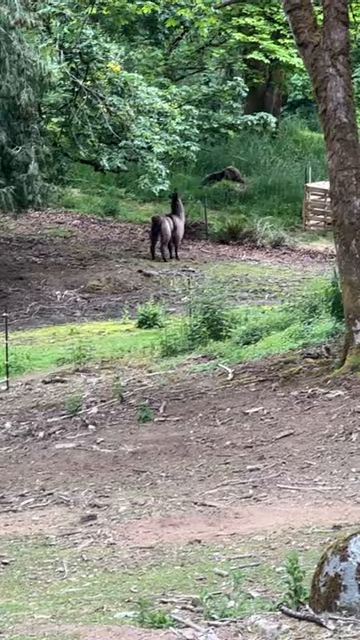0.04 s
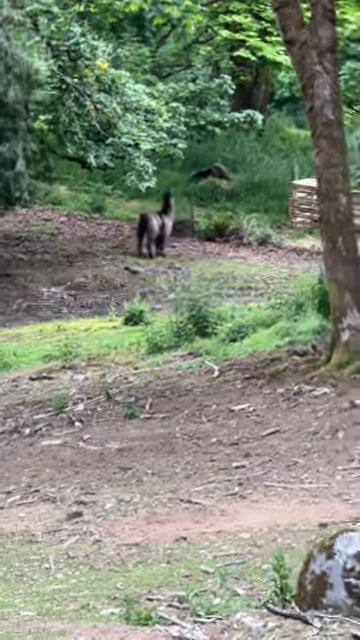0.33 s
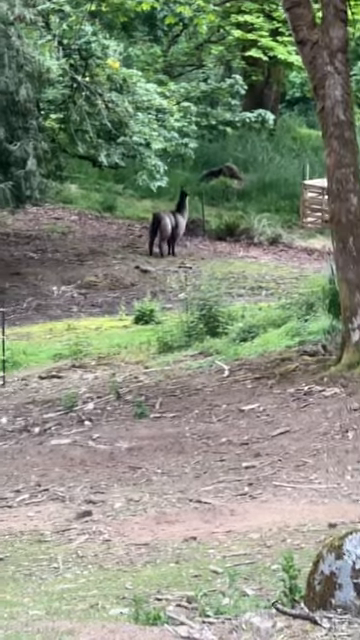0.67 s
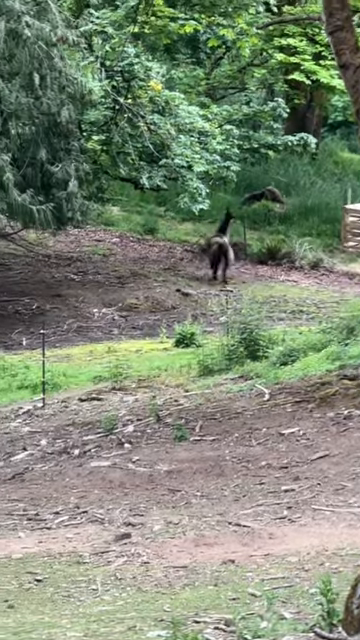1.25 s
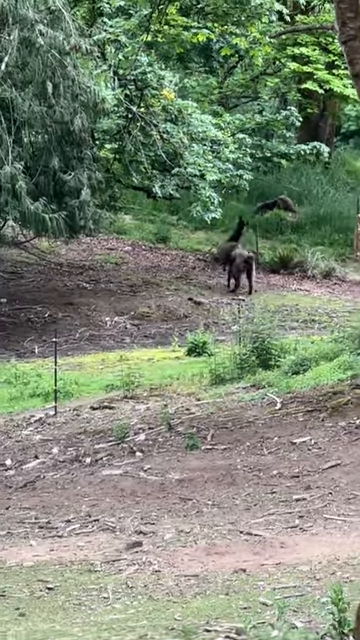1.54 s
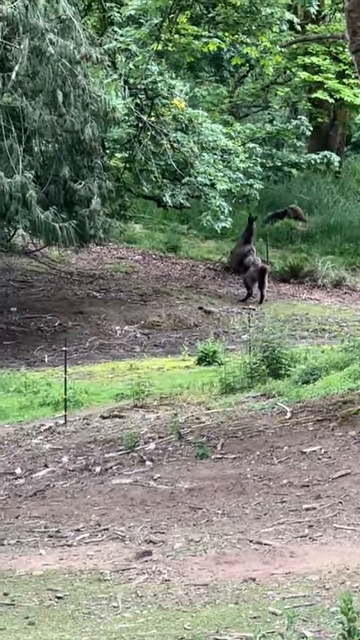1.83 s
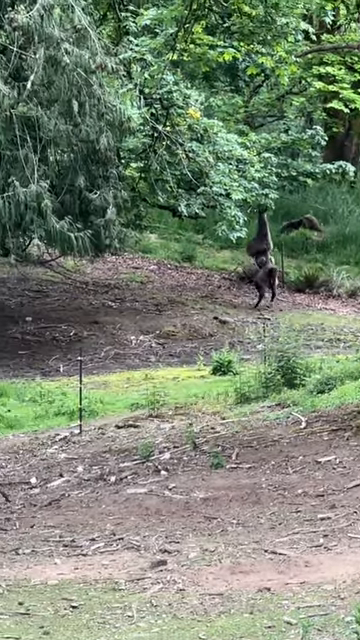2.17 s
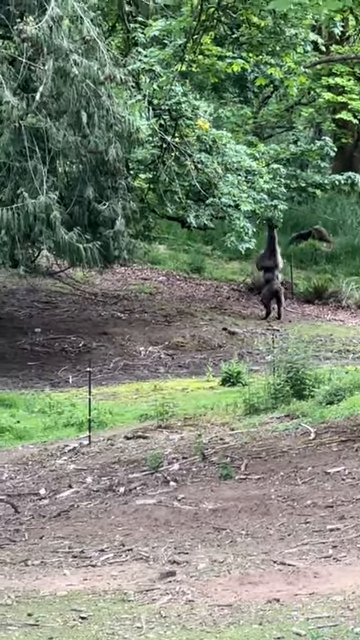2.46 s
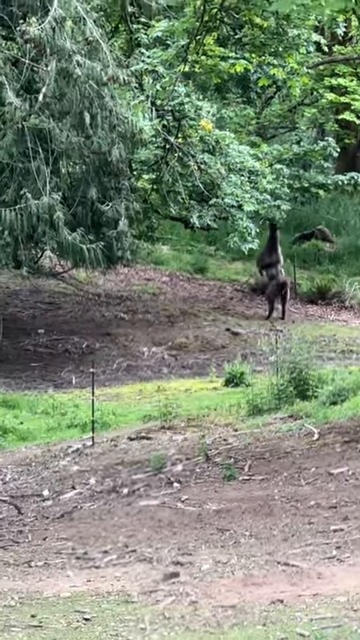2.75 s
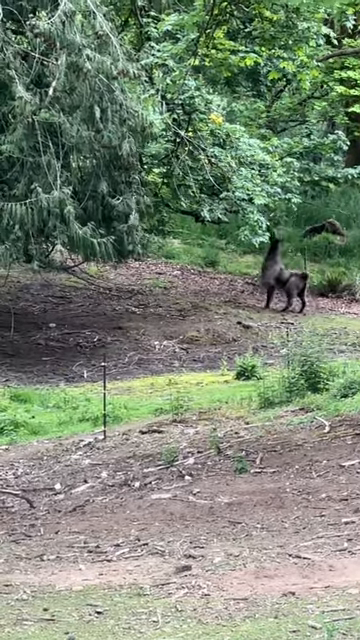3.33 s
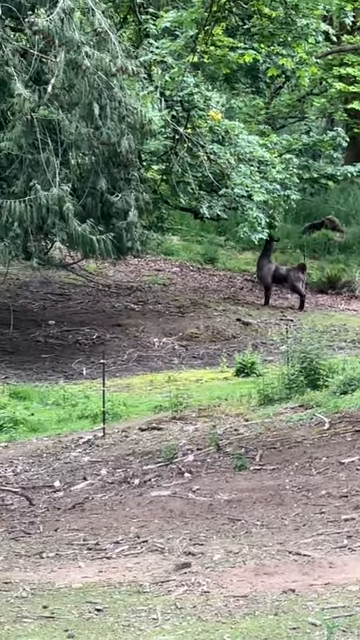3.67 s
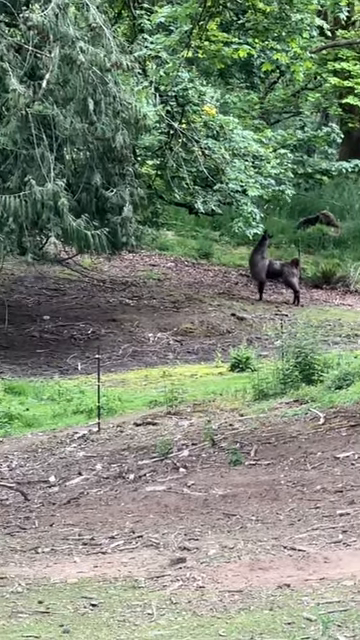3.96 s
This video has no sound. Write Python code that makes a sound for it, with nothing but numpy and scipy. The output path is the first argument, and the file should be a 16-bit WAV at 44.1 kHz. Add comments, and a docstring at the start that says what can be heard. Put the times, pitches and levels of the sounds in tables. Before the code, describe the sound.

Faint songbirds chirp and whistle in the woods over a low wind rumble.

```python
"""Songbirds whistle, chip and buzz at the edge of a wood, heard in stereo from a quiet paddock.
Their notes are gliding tones, pure or roughened; one loud call is close to the microphones, the rest
lie farther back. Branches and trunks scatter the notes and give them a tail. Wind rumbles low
underneath, with a faint hiss of leaves, a few soft rustles and small high ticks."""
import sys
import numpy as np
from scipy import signal
from scipy.fft import rfft, irfft
from scipy.io import wavfile

SR = 44100
rng = np.random.default_rng(int(sys.argv[2]) if len(sys.argv) > 2 else 0)


def generate_wav(signal):
    """Clip the signal to [-1, 1] and save it as 16-bit WAV at the path in sys.argv[1]."""
    frames = np.transpose(np.atleast_2d(signal))
    scaled = np.clip(frames, -1, 1) * 32767
    pcm = np.round(scaled).astype(np.int16)
    wavfile.write(sys.argv[1], SR, pcm)


N = 176400
TIME = np.arange(N) / SR

# the nearer run of down-swept chips: t/s, level/dB
NEAR_CHIP_RUN = [(.362, -67), (.592, -69), (.807, -71), (.972, -65.5), (1.135, -64.5), (1.297, -66),
                 (1.463, -63.5)]
# the farther run of chips: t/s, level/dB
FAR_CHIP_RUN = [(2.685, -81.5), (2.841, -77), (2.998, -78), (3.157, -78), (3.322, -77.5), (3.490, -77.5)]


def from_db(db):
    """Decibels to gain."""
    return 10 ** (np.asarray(db) / 20)


def rms_one(x):
    """Scale to unit rms."""
    return x / np.sqrt(np.mean(x ** 2) + 1e-20)


def level(points):
    """Gain over time from points of t/s, level/dB."""
    return from_db(np.interp(TIME, *np.transpose(points)))


def at_hz(points, hz):
    """Read a table on a log-frequency axis."""
    freqs, values = np.transpose(points)
    return np.interp(np.log(hz + .0011), np.log(freqs), values)


def add(out, s, sound):
    """Mix a sound in at s seconds."""
    i = max(int(s * SR), 0)
    out[i:i + len(sound)] += sound[:max(N - i, 0)]


def drift(rate_hz, size):
    """Random wander of about unit spread."""
    return np.interp(np.arange(size) / SR * rate_hz, np.arange(2048), rng.standard_normal(2048))


def progress(length):
    """0 to 1 over a length in seconds."""
    return np.linspace(0, 1, max(int(length * SR), 8))


def arc(u, pitches):
    """Parabola through start, middle and end pitch."""
    return np.polyval(np.polyfit([0, .5, 1], pitches, 2), u)


def swell(u, peak):
    """Rounded rise and fall, loudest at the share `peak` of its length."""
    return np.sin(np.pi * np.interp(u, [0, peak, 1], [0, .5, 1])).clip(0)


def tone(hz):
    """A sine of unit rms that follows a pitch."""
    return np.sqrt(2) * np.sin(2 * np.pi * np.cumsum(hz) / SR)


def noise(colour):
    """Unit-rms outdoor noise as a pair of microphones hears it, more alike at some pitches than others."""
    # likeness of left and right: f/Hz, correlation
    likeness = [(180, 1), (350, 0.72), (700, .0), (1300, 0.43), (1900, 1), (3600, 1), (4800, 0.42),
                (6000, 1), (9000, 0)]
    hz = np.arange(N // 2 + 1) * SR / N
    mid, side = rfft(rng.standard_normal((2, N)))
    alike = np.clip(at_hz(likeness, hz), -1, .997)
    pair = np.sqrt(1 + alike) * mid + np.sqrt(1 - alike) * side * [[1], [-1]]
    lowpass = 1 / np.sqrt(1 + (hz / 10130) ** 40)
    return rms_one(irfft(pair * lowpass * from_db(at_hz(colour, hz)), N))


def notes(rows, peak, waver, rough=.2):
    """Whistled notes, each one arc of pitch under one swell, fluttering through the leaves."""
    out = np.zeros(N)
    for s, length, *pitches, db in rows:
        u = progress(length)
        hz = arc(u, pitches) * (1 + waver * drift(300, len(u)))
        flutter = (1 + rough * drift(700, len(u))) / np.sqrt(1 + rough ** 2)
        add(out, s, from_db(db) * swell(u, peak) * flutter * tone(hz))
    return out


def series(rows, length_s, arc_hz, peak):
    """One rough note shape repeated at several strengths."""
    return notes([(s, length_s, *arc_hz, db) for s, db in rows], peak, waver=.025, rough=.8)


def hoarse(rows, width_hz, peak):
    """Gliding notes smeared into a band by multiplying them with low-passed noise."""
    out = np.zeros(N)
    lowpass = signal.butter(2, width_hz / 2, fs=SR, output="sos")
    for s, length, *pitches, db in rows:
        u = progress(length)
        grain = rms_one(signal.sosfilt(lowpass, rng.standard_normal(SR // 2)))[-len(u):]
        add(out, s, from_db(db) * swell(u, peak) * grain * tone(arc(u, pitches)))
    return out


def wood(x, direct_db, tail_db, t60_s, spread=.014):
    """Direct sound, quick scatter from nearby branches and a long tail from the trunks."""
    t = TIME[:SR]
    branches = rng.standard_normal(SR) * (rng.random(SR) < .02) * np.exp(-t / .0092)
    build_up = 1 - np.exp(-t / .0059)
    mid, side = rng.standard_normal((2, SR)) * from_db(-60 * t / t60_s) * build_up
    trunks = mid + spread * side * [[1], [-1]]
    echoes = (from_db(tail_db) * rms_one(trunks) + from_db(-9) * rms_one(branches)) / np.sqrt(SR)
    return from_db(direct_db) * x + signal.fftconvolve(x[None], echoes, axes=1)[:, :N]


def off_centre(x, lag_s):
    """Sound from one side reaches the left microphone later."""
    hz = np.arange(N // 2 + 1) * SR / N
    left = irfft(rfft(x[0]) * np.exp(-2j * np.pi * hz * lag_s), N)
    return np.array([left, x[1]])


def wind():
    """A steady low rumble, a gust swelling in the farther trees and air moving over the paddock."""
    # colours of the three noises: f/Hz, relative level/dB
    rumble_colour = [(20, -39.5), (30, -23), (42, -6.5), (55, -4.5), (68, 2), (90, -3), (118, -6),
                     (160, -17.5), (250, -29), (350, -45.5), (700, -79.5)]
    gust_colour = [(100, -16.5), (170, 1), (220, 2.5), (290, 1.5), (360, -20.5), (600, -43.5)]
    air_colour = [(100, -11.5), (250, 1.5), (400, 0), (700, -6.5), (1100, -15), (1700, -21.5), (3000, -22),
                  (9000, -46)]
    # rise and fall of gust and air: t/s, level/dB
    gust_level = [(0, -78.5), (1.9, -77.5), (2.4, -68.5), (2.7, -65), (3.1, -65), (3.4, -70), (4, -66.5)]
    air_level = [(0, -69), (.5, -72), (1.8, -74), (2.4, -74), (2.7, -69), (2.9, -71), (3.1, -68),
                 (3.5, -70), (4, -66.5)]
    rumble = from_db(-47) * noise(rumble_colour)
    gust = level(gust_level) * noise(gust_colour)
    air = level(air_level) * from_db(2.1 * drift(29.9, N)) * noise(air_colour)
    return rumble + gust + air


def leaves():
    """Leaves hiss faintly in the wind, with a slight flicker."""
    # colour of the hiss: f/Hz, relative level/dB
    hiss_colour = [(1000, -3.5), (1700, -5), (2300, 0.5), (3200, -3.5), (4500, -0.5), (5200, -2),
                   (7000, -6.5), (8600, 2.5), (9300, -10.5), (10400, -17), (11200, -40), (15000, -47)]
    # its rise and fall: t/s, level/dB
    hiss_level = [(0.03, -63), (.11, -72.5), (.17, -68), (.22, -73.5), (.31, -84), (.7, -83), (1.4, -82),
                  (2.2, -81.5), (2.28, -74), (2.55, -83), (3.0, -86), (3.38, -78), (3.45, -77.5), (4, -80)]
    return level(hiss_level) * from_db(.9 * drift(25, N)) * noise(hiss_colour)


def near_whistles():
    """Two birds in the nearer trees: one gives thin high notes, the other slurred whistles."""
    # each bird's notes: t/s, length/s, start f/Hz, middle f/Hz, end f/Hz, level/dB
    thin_notes = [ (.077, 0.014, 8280, 7830, 6070, -57), (.523, 0.029, 6110, 6160, 6290, -70),
                  (.555, 0.13, 6260, 6140, 6100, -79), (1.282, .016, 5480, 5450, 5160, -73),
                  (1.312, 0.04, 5350, 5360, 5390, -73)]
    whistles = [ (.126, 0.028, 3280, 3570, 3600, -66.5), (.254, 0.037, 1767, 2157, 2340, -63.5),
                (.315, 0.032, 4830, 4550, 4240, -73), (.475, 0.026, 2880, 3330, 4240, -74.5),
                (.535, 0.043, 4780, 4540, 4340, -72.5), (.608, 0.048, 2433, 2515, 2350, -70.5),
                (.640, 0.032, 2484, 2266, 1860, -71), (.672, 0.034, 2380, 2885, 2940, -73),
                (.692, 0.029, 3120, 3360, 4120, -70), (.703, 0.04, 3243, 2760, 2260, -68),
                (.752, 0.036, 4580, 4310, 4330, -71.5), (1.486, 0.031, 1874, 1940, 2120, -78.5),
                (1.524, 0.071, 2564, 2325, 2050, -76.5), (1.540, 0.026, 3300, 3650, 4500, -71.5),
                (1.572, 0.011, 2830, 3320, 3960, -72), (1.706, 0.017, 4250, 4360, 4400, -70),
                (1.850, 0.067, 4010, 4360, 4250, -69), (1.905, 0.056, 3595, 3455, 3560, -73.5),
                (1.990, 0.078, 3680, 3517, 3440, -71.5), (2.075, 0.055, 3490, 3400, 3350, -76),
                (2.130, 0.05, 3510, 4120, 4340, -75), (2.175, 0.04, 4480, 4470, 4300, -70),
                (2.737, 0.036, 3036, 2686, 2190, -73), (2.772, 0.043, 2783, 2755, 2730, -71),
                (2.828, 0.042, 2260, 2490, 2070, -74), (3.175, 0.076, 2750, 2760, 2700, -76),
                (3.255, 0.039, 2900, 2480, 2000, -76), (3.288, 0.1, 2090, 1914, 1790, -75.5),
                (3.685, .08, 4000, 4500, 4930, -80), (3.823, 0.02, 2860, 2510, 2360, -69),
                (3.838, 0.06, 2350, 2274, 2300, -73.5), (3.892, 0.057, 1776, 2080, 2220, -73.5)]
    return notes(thin_notes, peak=.72, waver=.0049) + notes(whistles, peak=.56, waver=.0069, rough=.43)


def rustles():
    """Soft uneven swishes of noise that rise fast and fall slowly."""
    # the swishes: t/s, length/s, level/dB
    swishes = [(0.099, 0.014, -60), (0.119, 0.014, -67.5), (2.487, 0.21, -75.5), (3.052, 0.31, -69.5),
               (3.714, 0.2, -71)]
    # their colour: f/Hz, relative level/dB
    swish_colour = [(200, -8), (500, 12), (1100, 7), (1600, 0), (2200, -4), (6000, -30), (10000, -48)]
    envelope = np.zeros(N)
    for s, length, db in swishes:
        add(envelope, s, from_db(db) * swell(progress(length), peak=.15))
    return envelope * from_db(2.8 * drift(50, N)) * noise(swish_colour)


def close_call():
    """One loud upward whistle from the bird closest to the microphones."""
    # its two overlapping notes: t/s, length/s, start f/Hz, middle f/Hz, end f/Hz, level/dB
    call = [(.146, 0.038, 2960, 3100, 3250, -60.5), (.162, 0.033, 3214, 3364, 3440, -44.5)]
    return notes(call, peak=.57, waver=.008, rough=.13)


def near_chips(lisp_hz=(6700, 5640, 4740)):
    """Down-swept chips, each opening with a hoarse high lisp; upward slurs fall between the later ones."""
    # the slurs: t/s, level/dB
    slur_run = [(.900, -73.5), (1.058, -72.5), (1.221, -70), (1.385, -72.5)]
    chips = series(NEAR_CHIP_RUN, length_s=.038, arc_hz=(5690, 4474, 4030), peak=.7)
    slurs = series(slur_run, length_s=.029, arc_hz=(2815, 3190, 3440), peak=.099)
    lisps = [(s - .014, .046, *lisp_hz, db - 8.5) for s, db in NEAR_CHIP_RUN]
    return chips + slurs + hoarse(lisps, width_hz=1200, peak=.52)


def chip_echoes(foot_hz=(4400, 4305, 4156), top_hz=(5470, 5330, 5270)):
    """The foot of each near chip and the top of each far one hang in the trees as a blurred band."""
    near = [(s + .02, .17, *foot_hz, db - 15) for s, db in NEAR_CHIP_RUN]
    far = [(s, .15, *top_hz, db - 6) for s, db in FAR_CHIP_RUN]
    return hoarse(near, width_hz=670, peak=.07) + hoarse(far, width_hz=410, peak=.055)


def far_whistles():
    """Blurred, wavering slurs from a bird deep in the wood."""
    # its notes: t/s, length/s, start f/Hz, middle f/Hz, end f/Hz, level/dB
    slurs = [ (.452, 0.014, 4750, 3600, 2560, -77), (.660, 0.019, 3800, 3140, 2700, -73),
             (1.560, .014, 4370, 3480, 2900, -70), (2.32, 0.083, 2266, 2340, 2260, -76.5),
             (2.360, 0.12, 4990, 4220, 3210, -71.5), (2.96, 0.084, 4100, 3950, 3880, -76.5),
             (3.175, 0.09, 3300, 3387, 2730, -73), (3.475, 0.035, 2770, 2566, 2550, -73),
             (3.54, .26, 2577, 2570, 2590, -84), (3.61, 0.1, 3320, 3750, 4070, -78),
             (3.74, 0.079, 4700, 3730, 3100, -78), (3.853, 0.026, 6540, 5330, 4470, -81.5)]
    return notes(slurs, peak=.38, waver=.02, rough=.65)


def ticks(ring_hz=8560, width_hz=160):
    """Tiny ticks, each a soft crack with a high, quickly dying ring."""
    # the noise bursts that excite them: t/s, level/dB
    onsets = [(0.508, -69), (1.256, -73.5), (1.913, -69), (2.243, -63), (2.252, -68), (2.299, -71),
              (3.751, -69.5), (3.907, -73)]
    bursts, cracks = np.zeros((2, N))
    t = TIME[:SR // 10]
    for s, db in onsets:
        grit = from_db(db) * rng.standard_normal(len(t)) * np.minimum(t / .003, 1)
        add(bursts, s, grit * np.exp(-t / .014))
        add(cracks, s, grit * np.exp(-t / .003))
    radius, angle = np.exp(-np.pi * width_hz / SR), 2 * np.pi * ring_hz / SR   # two-pole resonator
    gain = np.sqrt(2 * (1 - radius ** 2)) * np.sin(angle)
    ring = signal.lfilter([gain], [1, -2 * radius * np.cos(angle), radius ** 2], bursts + 1e-18)
    crack_band = signal.butter(2, [5000, 9200], "band", fs=SR, output="sos")
    return ring + from_db(-9) * signal.sosfilt(crack_band, cracks + 1e-18)


def buzzes(rate_hz=166, swing_hz=160):
    """Two voices of one syrinx, shaken together in pitch and level; the lower one peaks later."""
    # high buzzy calls: t/s, length/s, level/dB
    calls = [(0.535, 0.33, -64.5), (1.443, .270, -64.5), (2.768, 0.34, -71)]
    upper_hz, lower_hz = (8300, 8440, 8200), (7580, 7690, 7210)
    out = np.zeros(N)
    for s, length, db in calls:
        u = progress(length)
        beat = 2 * np.pi * np.cumsum(rate_hz * (1 + .016 * drift(29, len(u)))) / SR
        for pitches, voice_db, peak in (upper_hz, 0, .21), (lower_hz, -6, .66):
            hz = arc(u, pitches) + swing_hz * np.sin(beat) + 25 * drift(60, len(u))
            pulsing = 1 + .23 * np.cos(beat)
            flicker = from_db(1.63 * drift(45.4, len(u)))
            rasp = 1 + .3 * drift(900, len(u))
            add(out, s, from_db(db + voice_db) * swell(u, peak) * pulsing * flicker * rasp * tone(hz))
    breath = [(s, length, *lower_hz, db - 14) for s, length, db in calls]
    return out + hoarse(breath, width_hz=810, peak=.69)


def far_trills():
    """Distant, slightly sinking notes, shaken rapidly and unevenly in pitch and strength."""
    # the trills: t/s, length/s, start f/Hz, end f/Hz, beat rate/Hz, swing/Hz, level/dB
    trills = [(1.551, .45, 3990, 3640, 110.2, 265, -72.5), (2.792, 0.18, 4290, 4240, 138.4, 27.4, -79.5)]
    out = np.zeros(N)
    for s, length, start, end, rate, swing, db in trills:
        u = progress(length)
        beat = 2 * np.pi * np.cumsum(rate * (1 + .3 * drift(200, len(u)))) / SR
        hz = start + (end - start) * u + swing * np.sin(beat)
        pulsing = 1 + .48 * np.cos(beat)
        add(out, s, from_db(db) * np.sqrt(swell(u, peak=.27)) * pulsing * tone(hz))
    return out


def far_rasps():
    """Hoarse high calls far off, most of them falling."""
    # the calls: t/s, length/s, start f/Hz, middle f/Hz, end f/Hz, level/dB
    calls = [ (1.675, 0.029, 6960, 5800, 4780, -73), (1.972, 0.052, 6500, 5490, 4950, -74),
             (3.145, 0.065, 6600, 5960, 5640, -74.5), (3.34, 0.063, 7430, 7350, 7500, -76.5),
             (3.605, 0.1, 6430, 6010, 5700, -77)]
    return hoarse(calls, width_hz=1460, peak=.26)


def far_chips():
    """A run of slower downward sweeps from farther back in the trees."""
    return series(FAR_CHIP_RUN, length_s=.071, arc_hz=(5550, 4850, 3940), peak=.48)


def reedy_trill(start_s=3.878, attack_s=.028):
    """A near bird scoops up into a trill so fast that its pulse rate is heard as side tones."""
    # tones that waver together: f/Hz, level/dB
    partials = [(4235, -72), (4545, -71), (4850, -87), (5165, -78.5), (5465, -83)]
    opening = np.clip((TIME - start_s) / attack_s, 0, 1)
    bend = 1 + .011 * drift(400, N) - .084 * (1 - opening) ** 2
    return opening * sum(from_db(db) * tone(hz * bend) * (1 + .18 * drift(150, N)) for hz, db in partials)


def scene():
    """Birds at several distances in the wood, over the wind and leaves."""
    near = wood(near_whistles() + reedy_trill(), direct_db=1, tail_db=-4, t60_s=.97)
    close = wood(close_call(), direct_db=0, tail_db=-10, t60_s=.99)
    chips = wood(near_chips(), direct_db=-1.5, tail_db=-7.5, t60_s=.66)
    far_song = far_whistles() + far_trills() + far_rasps() + far_chips()
    far = wood(far_song, direct_db=-2.5, tail_db=-4, t60_s=.46)
    high = wood(ticks() + buzzes(), direct_db=1, tail_db=-6, t60_s=.35, spread=.25)
    from_trees = near + close + chips + chip_echoes() + far + off_centre(high, lag_s=2.2e-5)
    return from_trees + wind() + leaves() + rustles()


def record(dry, start_s=.031, fade_s=.005, cutoff_hz=15700):
    """The microphone signal fades quickly in and out, and its top treble is cut."""
    fade = np.clip(np.minimum(TIME - start_s, TIME[-1] - TIME) / fade_s, 0, 1)
    lowpass = signal.cheby2(12, 50, cutoff_hz, fs=SR, output="sos")
    return signal.sosfilt(lowpass, dry * fade)


dry = scene()
out = record(dry)
generate_wav(out)
```